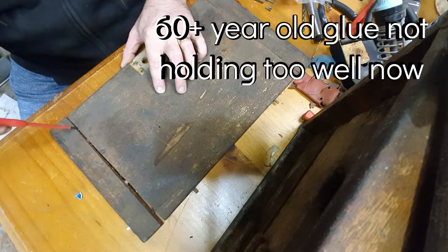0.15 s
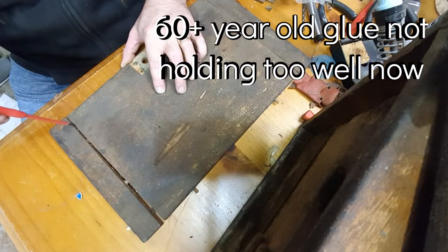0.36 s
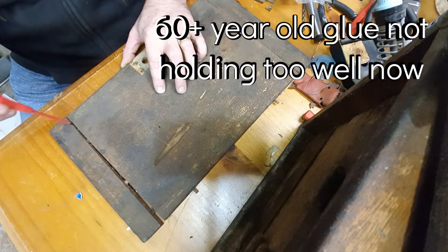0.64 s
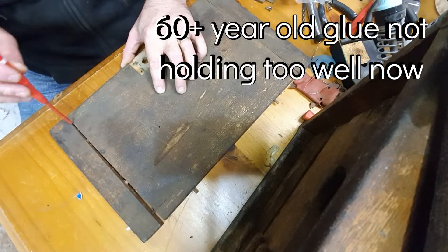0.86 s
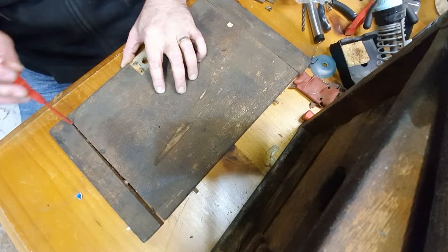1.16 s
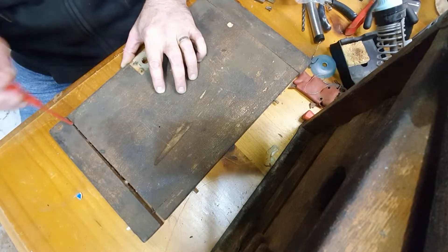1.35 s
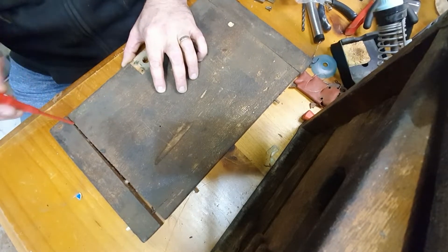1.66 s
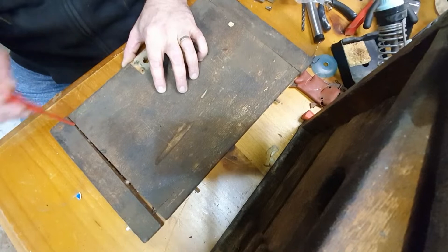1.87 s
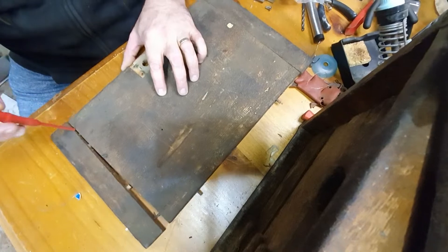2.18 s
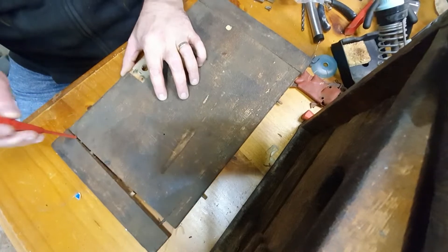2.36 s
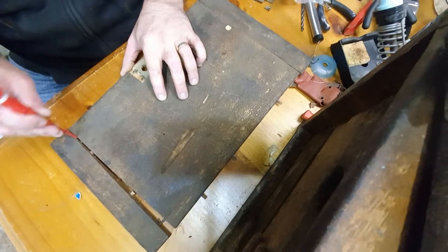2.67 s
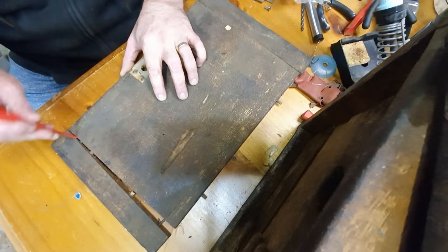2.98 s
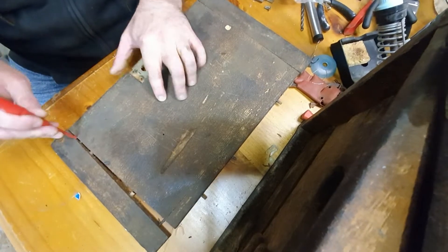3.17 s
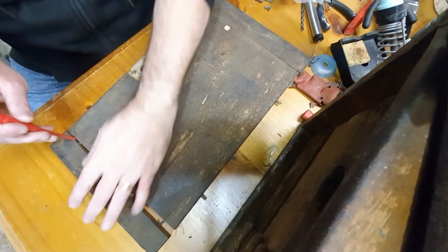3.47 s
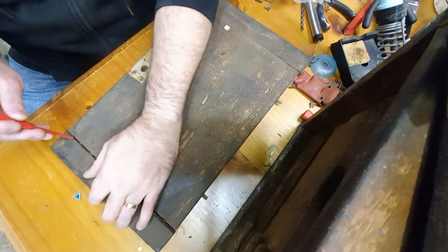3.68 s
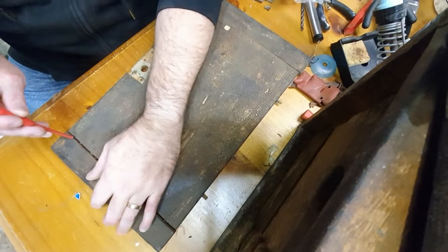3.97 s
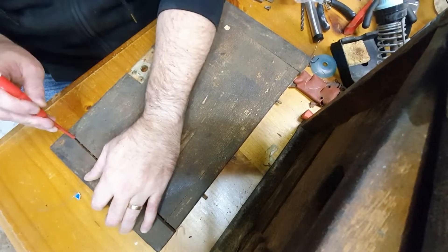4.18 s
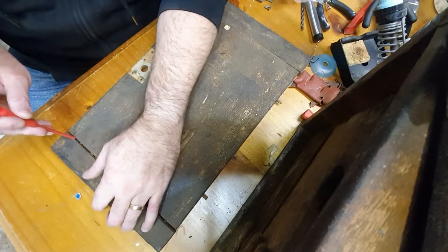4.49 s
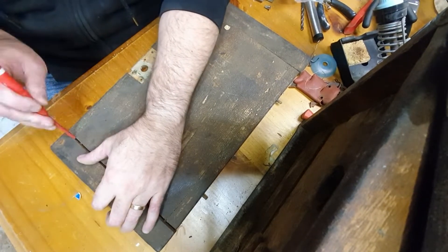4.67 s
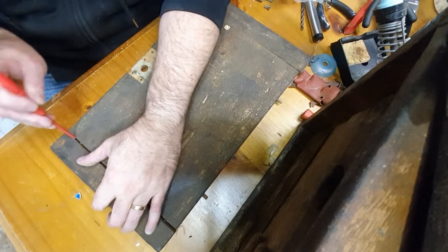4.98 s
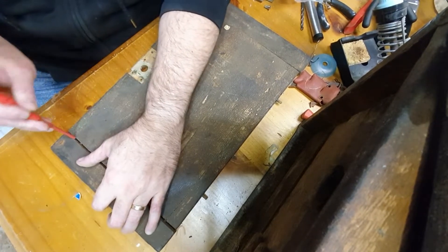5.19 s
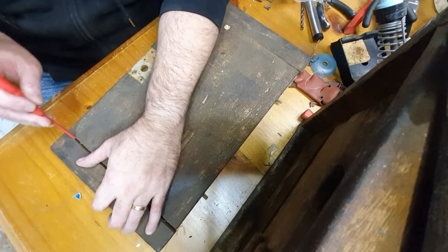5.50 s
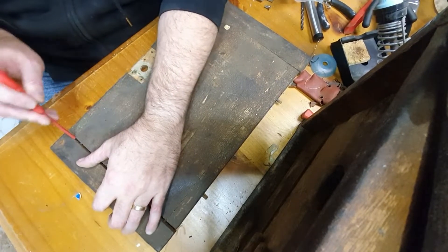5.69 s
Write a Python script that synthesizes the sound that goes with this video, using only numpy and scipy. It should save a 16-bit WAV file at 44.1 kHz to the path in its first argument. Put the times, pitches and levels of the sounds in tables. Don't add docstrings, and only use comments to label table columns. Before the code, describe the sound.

In a small workshop, a steel screwdriver works into the dry glued joint of an old wooden panel on a bench. Light taps and faint crackles come first, then a rapid run of hard woody knocks with bright blade pings and creaking rub. After that come scattered softer thumps, ticks and short scrapes. Close stereo microphone, leaning slightly left, short room echo, quiet low hum.

```python
import sys
import numpy as np
from scipy import signal
from scipy.fft import rfft, irfft
from scipy.io import wavfile
from scipy.ndimage import uniform_filter1d

SR = 44100
rng = np.random.default_rng(int(sys.argv[2]) if len(sys.argv) > 2 else 0)


def inscribe(sig):
    pcm = np.round(np.clip(np.atleast_2d(sig).T, -1, 1) * 32767)
    wavfile.write(sys.argv[1], SR, pcm.astype(np.int16))


def voltage_ratio(level):
    return 10 ** (np.asarray(level, float) / 20)


N = 257544
TIME = np.arange(N) / SR

# (frequency [Hz], density [dB per Hz])
HUM = [(25, -17.5), (45, 0.5), (78, 9.5), (174, -7), (296, -8), (565, -12), (838, -23.5), (1890, -31),
       (2180, -40), (4270, -43), (8150, -48), (15100, -51), (16400, -58.5)]
HUM_DB = -49
# (frequency [Hz], t60 [s])
ROOM_T60 = [(100, 0.5), (500, 0.27), (2000, 0.47), (5000, 0.2), (14000, .18)]
ROOM_DB = -2.5
# (frequency [Hz], level [dB])
MIC = [(15, -51.5), (45, -18.5), (90, 2.5), (15500, 1), (16150, -12), (17000, -44)]
# (frequency [Hz], level against the left [dB])
RIGHT_PORT = [(100, -0.5), (900, -0.5), (2200, -7), (4200, -2.5), (8000, -5), (13000, -9)]
PORT_LAG_S = 0.00022

# (frequency [Hz], level [dB], t60 [s])
BENCH = [(84.4, -17, 0.13), (118, -10, 0.097), (151, -8.5, 0.09), (183, -2, 0.07), (204, -2.5, 0.042),
         (251.8, -3, 0.046)]
# (frequency [Hz], level [dB], t60 [s])
PANEL = [(300.7, -0.5, 0.097), (350, 6, 0.046), (387, -6, 0.089), (500, -6, 0.07), (573, -0.5, 0.082),
         (681.6, -6, 0.072), (756, 0.5, 0.068), (849, -1, 0.038), (935, -5.5, 0.048), (1064.6, -4.5, 0.075),
         (1217, 4, 0.016), (1531.6, -3, 0.044)]
# (frequency [Hz], density [dB per Hz])
CONTACT = [(800, -20), (1500, 0), (2000, -1), (2700, -5), (3600, -20), (9000, -60)]
# (frequency [Hz], density [dB per Hz])
BLADE = [(1410, -34.5), (2400, -8.5), (2530, -16), (3330, -12), (3690, -18.5), (4060, -3.5), (4230, -2),
         (4660, -13), (5570, -43), (6170, -17.5), (7880, -45.5), (8610, -29.5), (10000, -71.5),
         (13000, -76.5), (22000, -120)]
# (frequency [Hz], density [dB per Hz])
TIP = [(1410, 3), (2400, -1), (3380, 3.5), (3670, 0), (4390, -7.5), (6790, -15), (9000, -25), (11700, -40),
       (19800, -76)]
# (frequency [Hz], density [dB per Hz])
GRIT = [(2940, -13.5), (5000, 1.5), (7560, -1.5), (10100, -1.5), (11500, 0), (14100, -7.5), (15300, -6),
        (16400, 0)]
# (frequency [Hz], level [dB])
AIR = [(8000, -18), (12500, -3), (15500, -2)]
# (frequency over the strongest [ratio], level [dB], t60 [s])
STEEL = [(0.8, -3, .02), (0.9, -8, .01), (0.985, -2.5, .016), (1.01, -0.5, .016), (1.12, -8, .008),
         (1.53, -22, .008), (2.05, -31, .005)]

# (time [s], prying pressure [dB], tip sliding [dB])
EFFORT = [(0.0, -24, -8), (0.44, 2.5, 0.5), (1.15, -21, -8), (1.61, 13.5, 12.5), (1.95, 20, 19),
          (2.18, 13, 15), (2.47, 7, 2), (2.71, -11, -5), (2.89, -6, -6), (3.27, 6.5, 14), (3.42, -12, 1.5),
          (4.11, -2.5, 0.5), (4.52, -6, 4.5), (5.09, -6, -1.5), (5.84, -2, 0.5)]
# (time [s], peak [dB], top octave over it [dB])
CRACKS = [(0.2972, -53.5, -16), (0.4753, -50, -32), (0.5445, -54, -12), (0.715, -50, -15), (0.866, -54, -8),
          (1.917, -34, -25), (4.473, -46, -12), (4.497, -52, -8), (4.872, -60, -12), (4.925, -60, -25),
          (3.241, -54, -15), (3.3275, -54, -25), (3.361, -54, -20), (0.6872, -44.5, -11),
          (0.7043, -38.5, -24), (0.8464, -40, 2), (1.1727, -40.5, -12), (1.2321, -40, -21),
          (1.3753, -40, -20), (1.416, -40.5, -18), (1.4561, -39, -17), (1.6222, -43.5, -23),
          (1.7335, -42, -22.5), (1.8851, -47, -23), (1.9093, -25.5, -44), (1.9659, -37, -15),
          (2.517, -52, -27.5), (2.3361, -44, -32), (2.6725, -41.5, -24), (2.7747, -32, -20),
          (2.9074, -39.5, -31.5), (3.202, -41, -13), (3.629, -35, -29), (3.7204, -40, -23.5),
          (4.1085, -45.5, -16), (4.4458, -38, -9), (4.6833, -45, -14), (5.0564, -35, -5.5),
          (5.458, -41, -11.5), (5.7728, -35, -6)]
# (time [s], peak [dB], top octave over it [dB], swell [s])
CRUMBLES = [(0.516, -49, -10, .005), (0.435, -58, -14, .012), (0.72, -58, -16, .018),
            (2.28, -52, -40, .045), (3.59, -54, -22, .015), (3.71, -55, -20, .04), (1.888, -41, -4, .012),
            (3.375, -56, -12, .02), (0.8594, -60, -10, .012), (3.24, -46, -16.5, 0.025),
            (4.6, -54, -14, 0.045), (2.425, -53.5, -9, 0.041), (2.7, -46.5, -10, .01),
            (3.27, -47, -17, 0.011), (4.668, -53, -5, .004), (4.45, -52, -10, .015), (1.2, -53, -18, 0.023),
            (0.68, -56, -15, 0.02), (2.9, -55, -15, 0.044)]
# (time [s], left minus right [dB])
SPLIT_PAN = [(0.6, 8.5), (1.25, -2), (1.6, -4), (2.6, -1.5), (5.5, -1.5)]
# (time [s], peak [dB], strongest mode [Hz])
PINGS = [(1.5492, -28.5, 4130), (1.5594, -31, 4200), (1.7104, -23, 4200), (1.717, -24, 4190),
         (1.8741, -14, 4160), (1.8846, -13.5, 4200), (2.048, -13, 4140), (2.0626, -15.5, 4216),
         (2.078, -30, 4200), (2.7763, -26, 4350), (2.906, -35.5, 4200), (3.058, -34.5, 4280),
         (3.2015, -40, 4200), (3.252, -46, 4280), (3.7192, -34, 4300), (3.39, -47, 4300),
         (1.916, -31, 4300)]
# (time [s], peak [dB], pitch [Hz])
HOLLOWS = [(1.171, -36, 1550), (4.444, -35, 1550), (4.446, -42, 2500), (3.722, -44, 6400),
           (3.713, -38, 1050), (3.61, -46, 1600), (3.632, -38, 750), (1.36, -34, 760), (5.27, -48, 1485),
           (5.454, -44, 1500), (1.876, -22, 1190), (2.05, -24, 1150), (2.064, -24, 570), (1.982, -30, 2900),
           (1.988, -30, 3300), (3.716, -37, 762)]
# (time [s], peak [dB], wood contact over it [dB])
TICKS = [(0.476, -43.5, 1), (0.7028, -48.5, -13), (0.847, -47, 0), (1.231, -45, -26), (1.4486, -46, -2),
         (1.492, -37, -8), (2.3347, -39.5, -22), (2.517, -54, -20), (2.7013, -45, -21),
         (3.1086, -44.5, -14), (3.2, -44, -25), (3.3297, -47, 4), (3.359, -42, 0), (3.6157, -44, -3.5),
         (3.7135, -36, -5), (4.1075, -37, 0), (4.4705, -46, -7), (4.6836, -37.5, -7), (5.284, -54, -14.5),
         (5.3184, -54, -14), (0.2972, -57, -11), (4.4455, -35, 20), (4.496, -53, -2), (4.765, -54, -10.5),
         (5.02, -63, -11), (1.172, -50, 14), (5.682, -54.5, -11), (1.141, -52, -8), (1.412, -49, -10),
         (5.27, -55, 9)]
# (time [s], peak [dB], share of blade ring [0-1])
BOUNCES = [
    (1.558, -27.5, 0.5),
    (1.7173, -23, 0.13),
    (1.8844, -20, 0.43),
    (1.988, -31.5, 0.9),
    (2.0624, -21.5, 0.8),
    (5.0713, -40.5, 0.2),
    (3.251, -53, 0.8),
]
# (middle [s], length [s], peak [dB], share of blade ring [0-1])
SCRAPES = [
    (0.77, 0.064, -37.5, 0.25),
    (2.338, 0.066, -32, 0.66),
    (3.1, 0.046, -49, 0),
    (3.614, 0.013, -39, 0.14),
    (3.765, 0.045, -41, 0.15),
    (4.093, .03, -39.5, 0),
    (4.645, .045, -40, 0.2),
    (5.324, 0.077, -56, 0.1),
    (1.972, .008, -22.5, 0.37),
    (0.47, .04, -48, 0.1),
]
# (time [s], bench thump peak [dB], panel ring over it [dB], thump [Hz], tip peak [dB])
TAPS = [(0.183, -31, 3, 148, -41), (0.347, -42, 3.5, 94.2, -57), (0.689, -31.5, -12.5, 118, -54),
        (1.169, -36, 5, 269, -39), (1.36, -25.5, 2, 269, -43), (1.3815, -22, -11.5, 120, -38),
        (1.463, -19.5, -10.5, 207, -36.5), (1.5496, -19.5, 4.5, 199, -25), (1.7104, -17, 2, 142, -18),
        (1.8737, -14, 3.5, 198, -10), (1.9815, -20.5, -5, 172, -21.5), (2.0477, -12.5, -5.5, 214, -10),
        (2.67, -33, -14.5, 180, -35.5), (2.776, -18, -5, 201, -25), (2.9053, -23.5, -13.5, 182, -29),
        (3.0577, -30.5, -3.5, 159, -33.5), (3.371, -34, -4, 125.4, -39.5), (3.63, -30.5, -4, 119, -31),
        (4.443, -35, 6, 108, -33.5), (5.058, -28, -10.5, 125, -36.5), (5.454, -28, -7, 177.5, -35.5),
        (5.667, -36, -11.5, 191, -50.5), (5.7714, -31.5, -9.5, 183, -33.5)]
# (time [s], bench thump peak [dB], panel ring over it [dB], thump [Hz])
KNOCKS = [(0.708, -39.5, -2.5, 135), (1.137, -28, -2, 221), (1.409, -27, -11, 122), (1.621, -23, -8.5, 156),
          (1.795, -19.5, -5.5, 208), (2.121, -36, 5.5, 166.5), (2.315, -31, -10, 196),
          (3.269, -37, -4, 176), (3.711, -31, 1.5, 153), (4.103, -31.5, -5, 199), (4.435, -38, 2, 200),
          (4.887, -32.5, -12, 158.7), (5.071, -27, -15, 172), (5.269, -33, -5, 113),
          (5.612, -34.5, -6.5, 116), (1.945, -21, -2.5, 170), (2.066, -19.5, 0, 190), (3.72, -35, 8, 200),
          (0.4753, -47.5, 0, 150), (5.449, -34.5, -1.5, 180)]
# (time [s], peak [dB], thump [Hz])
THUDS = [(0.132, -38.5, 108), (0.548, -37.5, 151), (0.901, -37, 88), (1.259, -41, 114), (1.599, -26, 183),
         (1.764, -17, 195), (3.169, -27.5, 199), (3.335, -22.5, 130), (3.397, -29.5, 130), (4.22, -39, 91),
         (4.669, -27, 205), (4.09, -36, 170), (0.847, -38, 120), (2.517, -36.5, 149), (3.612, -33.5, 150),
         (3.76, -33.5, 172)]

WOOD_PAN_DB, THUD_PANEL_DB = 1.9, -19.5
TAP_PUSH_S, ROCK_PUSH_S = 0.00009, 0.00025
MIDDLING_DB, BLADE_SHARE, SHARE_PER_DB = -35, 0.16, 0.02
CONTACT_DB, CONTACT_PER_DB, TIP_PAN_DB, PAN_PER_DB = -7, -0.23, 3.5, -0.2
CHATTER_S, CHATTER_DB_PER_DB = 0.0024, -0.1671
CREAK_DB, CREAK_PER_DB, PANEL_RUB_DB = -62, 0.41, -69.5
TIP_RUB_DB, GRIT_DB, GRIT_PER_DB = -74, -108, 1.77
SNAP_S, PING_PUSH_S, HOLLOW_T60_S = 0.0011, 0.0004, 0.04


def unit(x):
    return x / np.sqrt(np.mean(x ** 2))


def colour(x, points):
    hz, db = np.transpose(points)
    axis = np.maximum(np.arange(len(x) // 2 + 1) * SR / len(x), 1)
    gain = voltage_ratio(np.interp(np.log(axis), np.log(hz), db))
    return irfft(rfft(x) * gain, len(x))


def response(points):
    hz, db = np.transpose(points)
    axis = np.maximum(np.arange(2049) * SR / 4096, 1)
    cep = irfft(np.log(voltage_ratio(np.interp(np.log(axis), np.log(hz), db))))
    cep[1:2048] *= 2
    cep[2049:] = 0
    return irfft(np.exp(rfft(cep)))[:2048]


def walk(rate):
    k = int(SR / rate)
    steps = np.repeat(rng.standard_normal(N // k + 1), k)
    return 1.3 * uniform_filter1d(uniform_filter1d(steps, k), k)[:N]


def through(force, impulse):
    impulse = impulse / np.linalg.norm(impulse)
    return signal.fftconvolve(force, np.reshape(impulse, (1,) * (force.ndim - 1) + (-1,)), axes=-1)


def ports(x, pan_db):
    return x * voltage_ratio(np.array([[.5], [-.5]]) * pan_db)


def add(track, s, sound, peak_db, pan_db):
    i = int(s * SR)
    sound = sound[..., :N - i]
    sound = sound * voltage_ratio(peak_db) / np.max(np.abs(sound))
    track[:, i:i + sound.shape[-1]] += ports(sound, pan_db)


def hum():
    low_side = [(30, -15.0), (200, -11.5), (1000, -0.5), (16000, 0)]
    mid, side = (unit(colour(rng.standard_normal(N), HUM)) for _ in range(2))
    swell = voltage_ratio(HUM_DB + 0.5 * walk(3.26))
    return swell * (mid + colour(side, low_side) * np.array([[1.], [-1.]]))


def room(x):
    t = np.arange(SR // 2) / SR
    hz, t60 = np.transpose(ROOM_T60)
    build_up = 1 - np.exp(-(t / 0.0021) ** 2)
    tail = 0
    for centre_hz in 60 * 2. ** np.arange(9):
        band = [(centre_hz / 2, -40), (centre_hz / 2 ** .5, -3), (centre_hz, 0),
                (centre_hz * 2 ** .5, -3), (centre_hz * 2, -40)]
        mid, side = (colour(rng.standard_normal(len(t)), band) for _ in range(2))
        band_t60 = np.interp(np.log(centre_hz), np.log(hz), t60)
        fade = unit(np.exp(-np.log(1000) * t / band_t60) * build_up)
        tail = tail + fade * (mid + min(centre_hz / 1800, 1) * side * np.array([[1], [-1]]))
    return voltage_ratio(ROOM_DB) * signal.fftconvolve(x[None], tail / np.sqrt(len(t)), axes=1)[:, :N]


def slips(rate, spread_db):
    moments = rng.random(N) < rate / SR
    clicks = moments * voltage_ratio(spread_db * rng.exponential(size=N)) * rng.standard_normal(N)
    return clicks * voltage_ratio(2.5 * walk(60))


def damped(modes):
    hz, db, _ = np.transpose(modes)
    return response([(hz[0] / 2, -30), *zip(hz, db), (hz[-1] * 2, -36), (hz[-1] * 8, -90)])


def rubbing():
    s, *curves = np.transpose(EFFORT)
    pry_db, slide_db = (np.interp(TIME, s, curve) for curve in curves)

    def drive(force, impulse):
        return unit(through(force, impulse)[:N])

    bench = drive(slips(250, 2), damped(BENCH))
    panel = drive(slips(1200, 2), damped(PANEL))
    force = slips(4000, 2)
    tip = drive(force, response(TIP))
    tip = tip + .2 * drive(force, response(BLADE)) + .6 * drive(force, response(CONTACT))
    grit = drive(slips(16000, .7), response(GRIT))
    wood = bench * voltage_ratio(CREAK_DB + CREAK_PER_DB * pry_db) + panel * voltage_ratio(PANEL_RUB_DB + pry_db)
    tip = tip * voltage_ratio(TIP_RUB_DB + slide_db)
    grit = grit * voltage_ratio(GRIT_DB + GRIT_PER_DB * slide_db)
    return ports(wood, WOOD_PAN_DB) + ports(tip, 0.94) + ports(grit, 2.5)


def burst(push_s, tail_db, t60):
    t = np.arange(SR // 6) / SR
    noise = rng.standard_normal((3, len(t)))
    chatter = np.e * t / push_s * np.exp(-t / push_s) * noise[0]
    tail = voltage_ratio(tail_db) * np.exp(-np.log(1000) * t / t60) * (1 - np.exp(-t / 0.0016))
    return chatter + tail * (0.14 * noise[0] + noise[1:])


def cracks():
    out = np.zeros((2, N))
    grit, air = unit(response(GRIT)), unit(response(AIR))
    uneven = voltage_ratio(1.8 * walk(400) + 0.7 * walk(70))
    snaps = [(*crack, SNAP_S) for crack in CRACKS]
    for s, db, air_db, push_s in snaps + CRUMBLES:
        force = burst(push_s, -18.0, 0.28)
        force = force * np.roll(uneven, -int(s * SR))[:force.shape[1]]
        bright = grit + voltage_ratio(1.4 * air_db + 5.0) * air
        add(out, s, through(force, bright), db + 0.5, np.interp(s, *np.transpose(SPLIT_PAN)))
    return out


def mode(hz, t60):
    t = np.arange(SR // 20) / SR
    return np.exp(-np.log(1000) * t / t60) * (1 - np.exp(-(t * hz) ** 2)) * np.sin(2 * np.pi * hz * t)


def pings():
    out = np.zeros((2, N))
    for s, db, hz in PINGS:
        blade = sum(voltage_ratio(mode_db + 2.5 * rng.standard_normal()) * mode(ratio * hz, t60)
                    for ratio, mode_db, t60 in STEEL)
        add(out, s, through(burst(PING_PUSH_S, -30.0, 0.35), blade), db, -2.5)
    for s, db, hz in HOLLOWS:
        add(out, s, through(burst(PING_PUSH_S, -26.0, 0.2), mode(hz, HOLLOW_T60_S)), db, 4.5)
    return out


def ticks():
    out = np.zeros((2, N))
    blade, tip, wood = (unit(response(points)) for points in (BLADE, TIP, CONTACT))

    def body(share, contact_db):
        return np.clip(share, 0, 1) * (blade - tip) + tip + voltage_ratio(contact_db) * wood

    def contact(db):
        return CONTACT_DB + CONTACT_PER_DB * (db - MIDDLING_DB)

    def steel(db):
        return BLADE_SHARE + SHARE_PER_DB * (db - MIDDLING_DB)

    touches = [(s, db, contact(db), steel(db)) for s, *_, db in TAPS]
    touches += [(s, db, contact_db, steel(db)) for s, db, contact_db in TICKS]
    touches += [(s, db, contact(db), share) for s, db, share in BOUNCES]
    for s, db, contact_db, share in touches:
        harder_db = db - MIDDLING_DB
        force = burst(CHATTER_S * voltage_ratio(CHATTER_DB_PER_DB * harder_db), -13.0, 0.3)
        add(out, s, through(force, body(share, contact_db)), db + 2.5, TIP_PAN_DB + PAN_PER_DB * harder_db)
    grain = slips(5000, 2.2)
    for s, length, db, share in SCRAPES:
        t = np.arange(-2, 2, 1 / (length * SR))
        starts = rng.integers(N // 2, size=(2, 1))
        drag = np.exp(-t ** 2) * grain[starts + np.arange(len(t))]
        add(out, s - 2 * length, through(drag + 1.1 * drag[0], body(share, -3.2)), db, 1.5)
    return out


def ring(modes, scatter_db, detune, filler_db):
    hz, db, t60 = np.transpose(modes)
    between = hz[0] * (hz[-1] / hz[0]) ** rng.random(2 * len(hz))
    db = np.r_[db, np.interp(between, hz, db) + filler_db]
    t60 = np.r_[t60, np.interp(between, hz, t60)]
    hz = np.r_[hz, between]
    luck = rng.standard_normal((3, len(hz)))
    gain = voltage_ratio(db + scatter_db * luck[0]) * np.sign(luck[2])
    hz = hz * (1 + detune * luck[1])
    pole = np.exp((2j * np.pi * hz - np.log(1000) / t60) / SR)
    vibration = np.cumprod(np.tile(pole, (SR // 10, 1)), axis=0).imag @ gain
    return vibration * np.cos(np.linspace(0, np.pi / 2, SR // 10))


def blow(push_s, rough):
    t = np.arange(SR // 50) / SR
    return t / push_s * np.exp(-t / push_s) * (1 - rough + rough * rng.standard_normal(len(t)))


def knocks():
    out = np.zeros((2, N))
    rocks = KNOCKS + [(s, db, THUD_PANEL_DB, hz) for s, db, hz in THUDS]
    for table, push_s in ((TAPS, TAP_PUSH_S), (rocks, ROCK_PUSH_S)):
        for s, db, panel_db, thump_hz, *_ in table:
            near = [(hz, mode_db - 12 * abs(np.log2(hz / thump_hz)), t60) for hz, mode_db, t60 in BENCH]
            thump = through(blow(push_s + 0.0004, .1), ring(near, 1.1, 0.02, filler_db=-5))
            panel = through(blow(push_s, 0.11), ring(PANEL, 0.94, 0.019, filler_db=-5))
            add(out, s, thump, db - 4.0, WOOD_PAN_DB)
            add(out, s, panel, db + panel_db + 1.5, WOOD_PAN_DB)
    return out


def scene():
    wood = knocks() + rubbing()
    left, right = wood + ticks() + cracks() + pings()
    hz = np.arange(N // 2 + 1) * SR / N
    late = irfft(rfft(right) * np.exp(-2j * np.pi * hz * PORT_LAG_S), N)
    heard = np.array([left, late]) + room(np.mean(wood, axis=0))
    left, right = signal.fftconvolve(heard, response(MIC)[None], axes=1)[:, :N] + hum()
    return np.array([left, colour(right, RIGHT_PORT)])


def top_cut(x):
    return signal.sosfilt(signal.butter(12, 16590, fs=SR, output="sos"), x)


def record(dry):
    return top_cut(dry)


dry = scene()
out = record(dry)
inscribe(out)
```